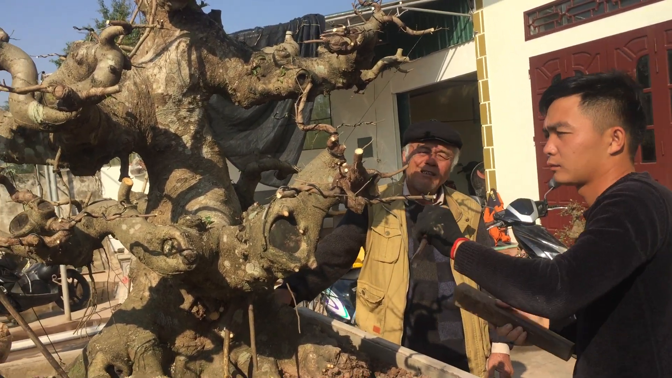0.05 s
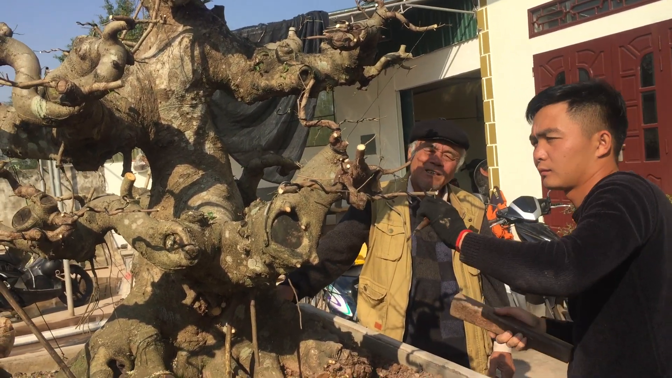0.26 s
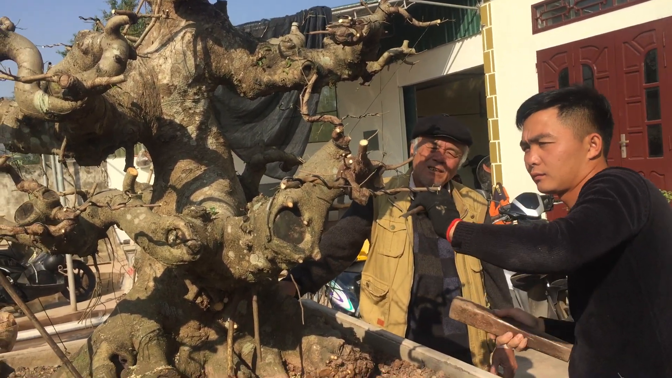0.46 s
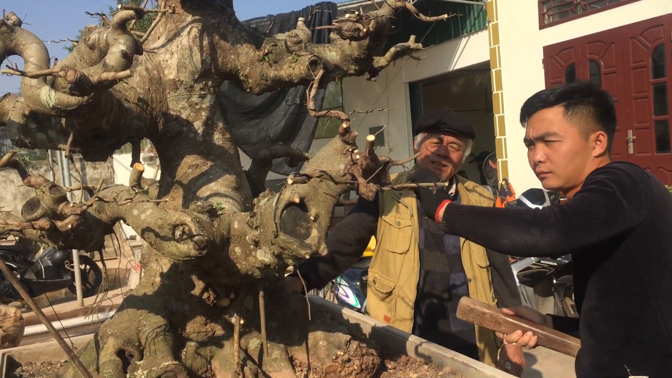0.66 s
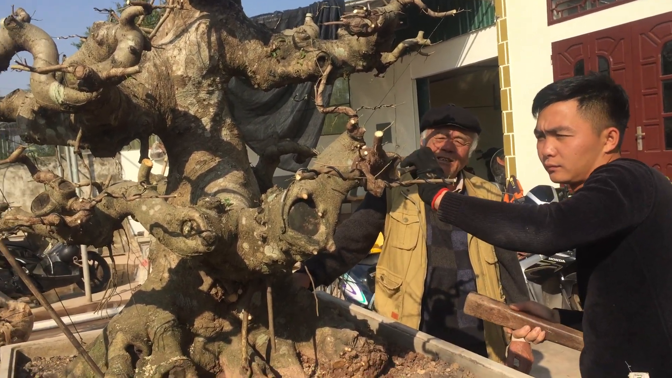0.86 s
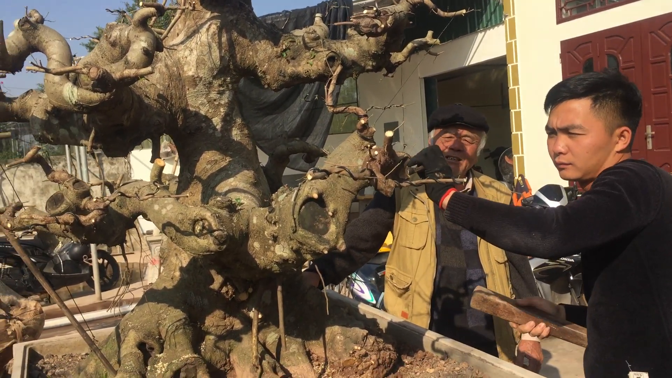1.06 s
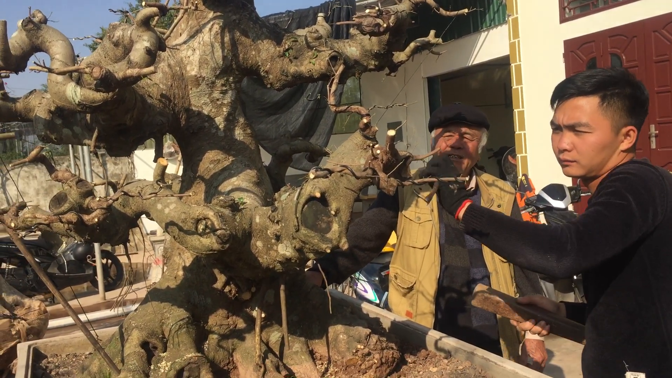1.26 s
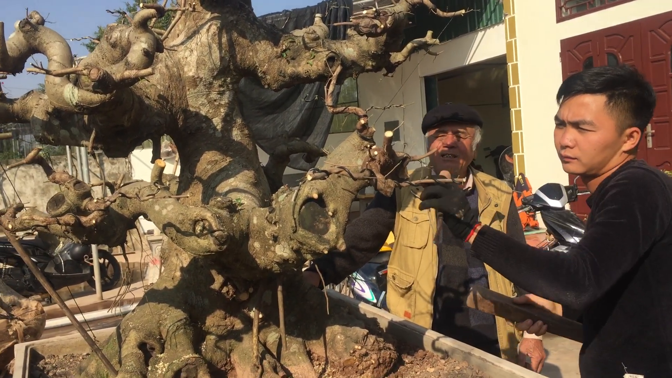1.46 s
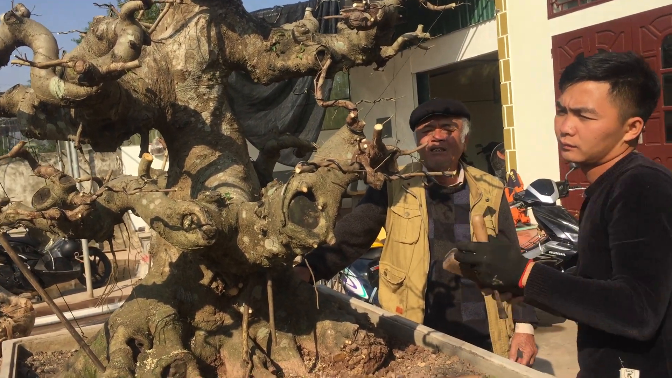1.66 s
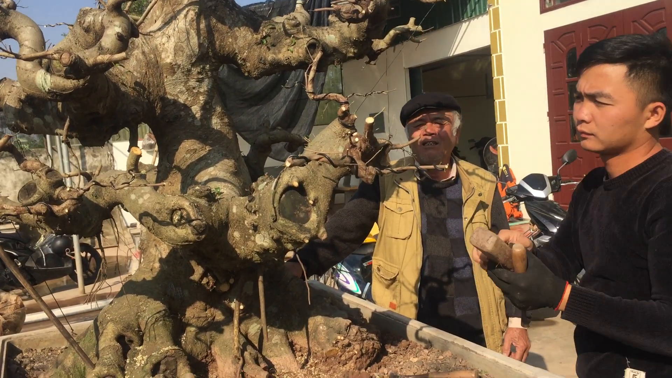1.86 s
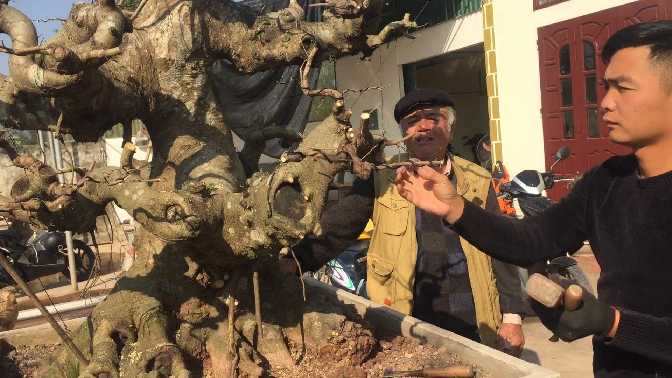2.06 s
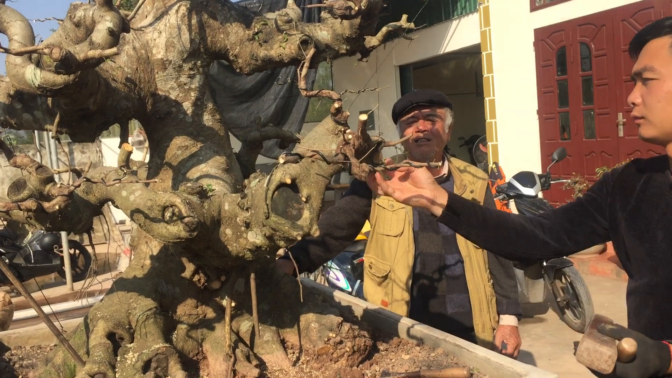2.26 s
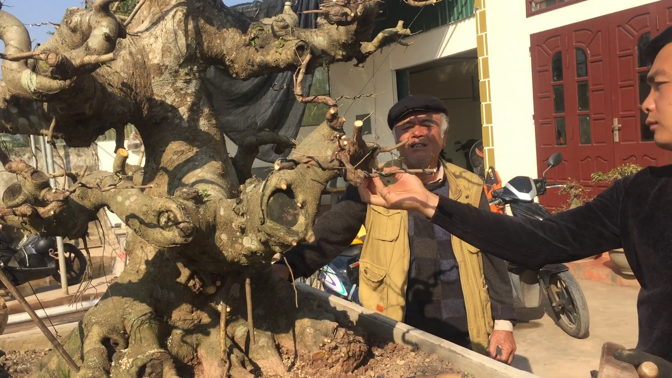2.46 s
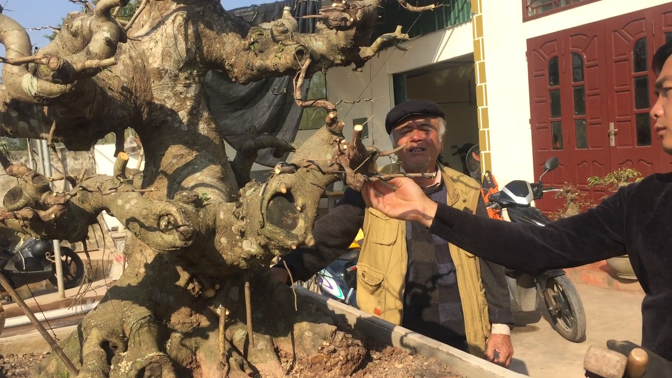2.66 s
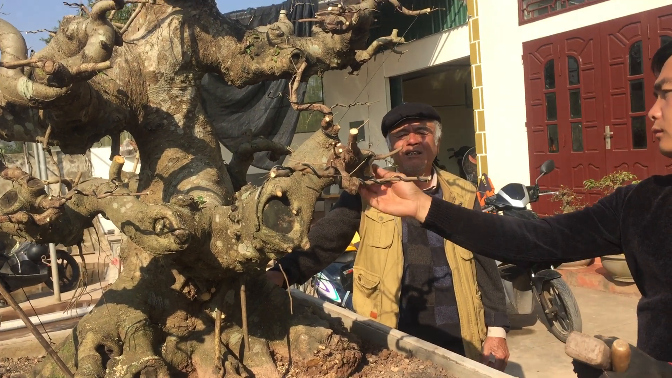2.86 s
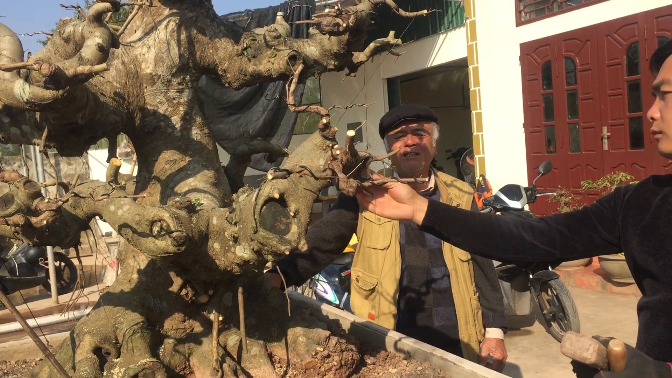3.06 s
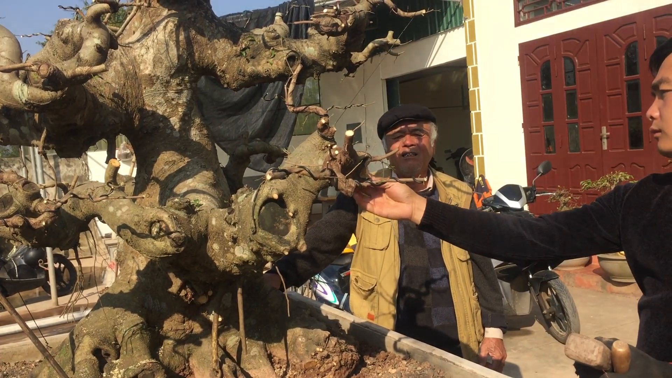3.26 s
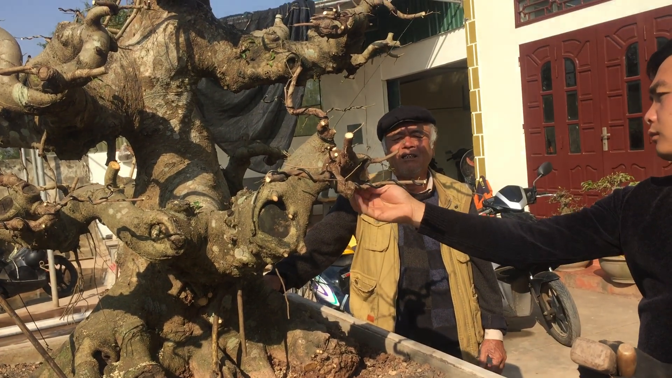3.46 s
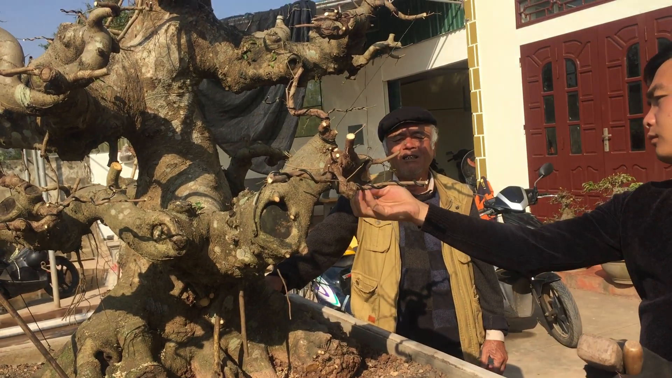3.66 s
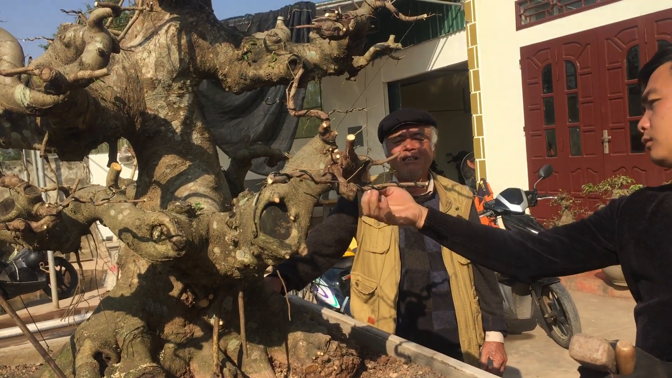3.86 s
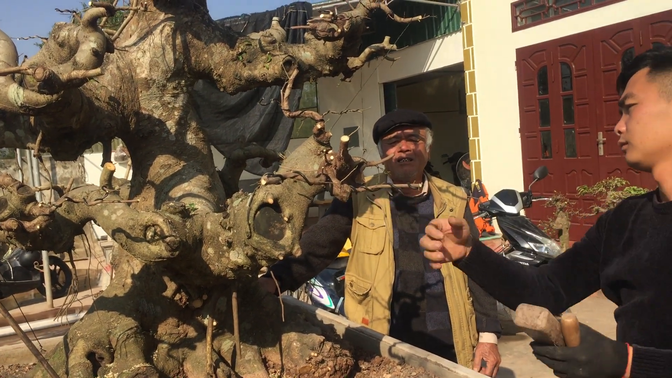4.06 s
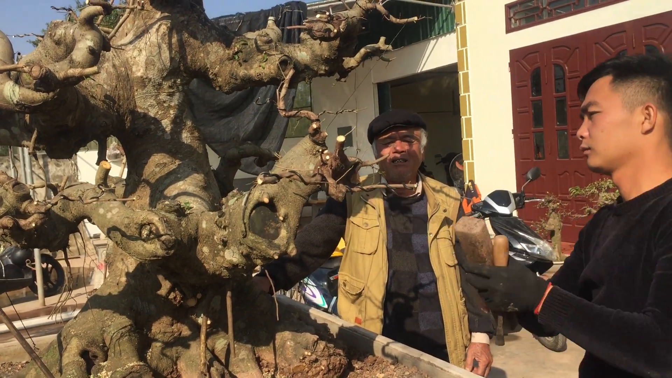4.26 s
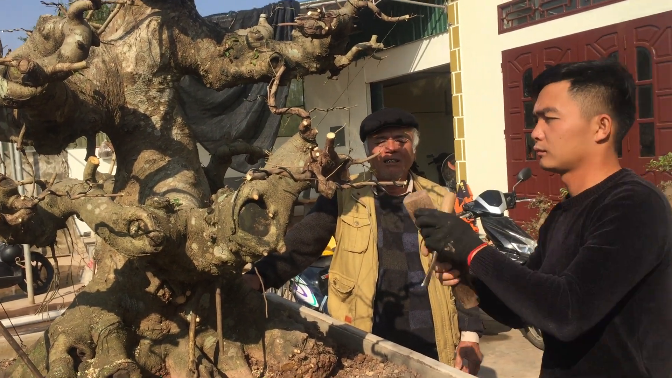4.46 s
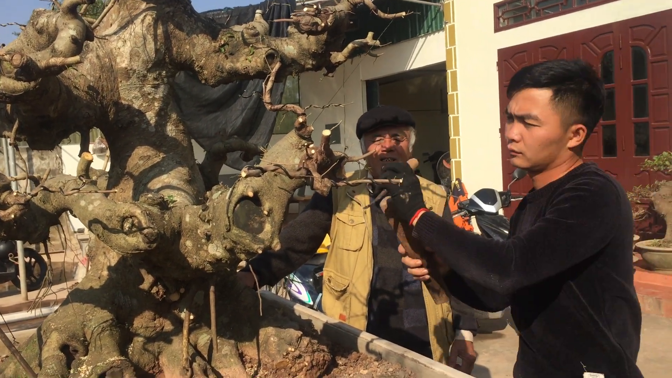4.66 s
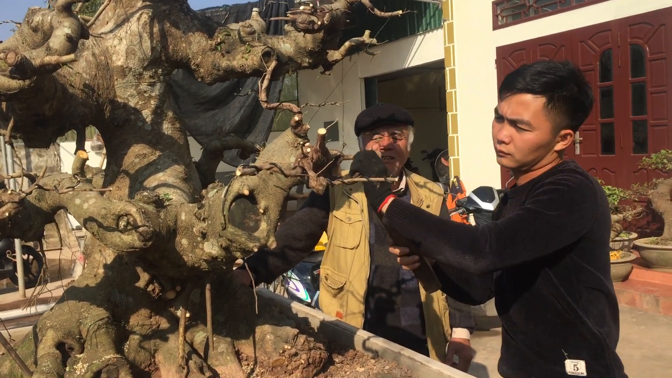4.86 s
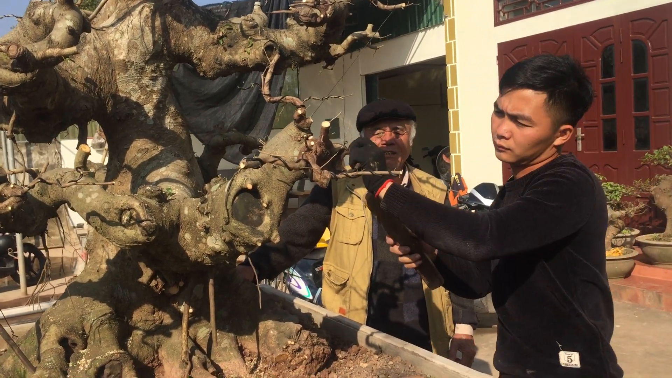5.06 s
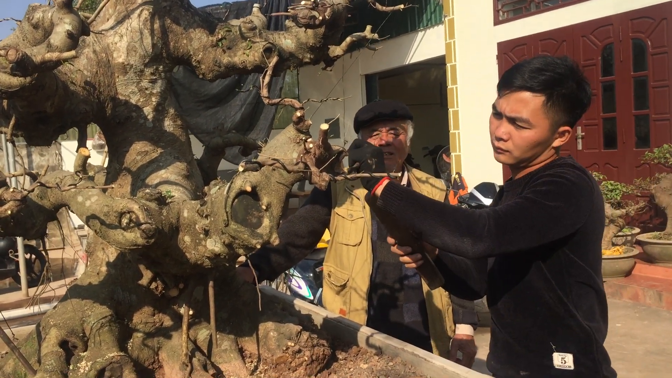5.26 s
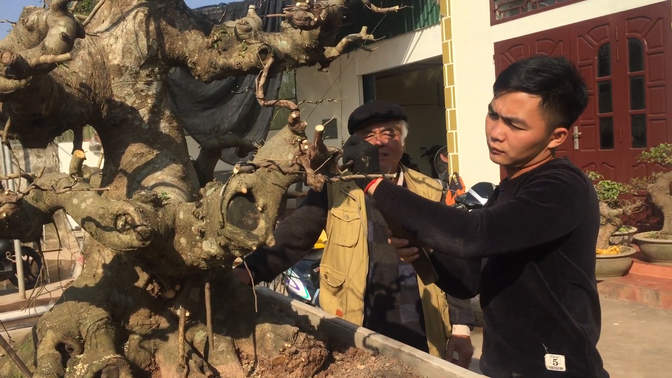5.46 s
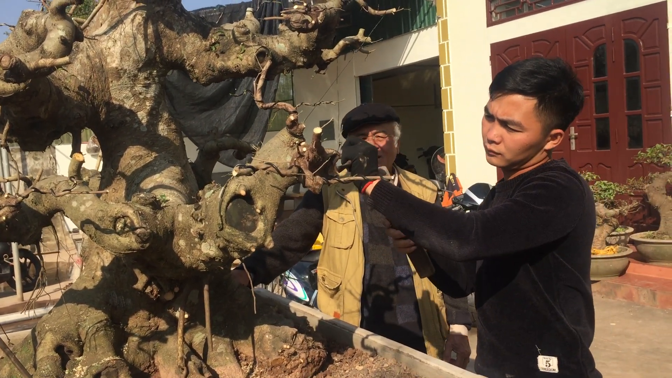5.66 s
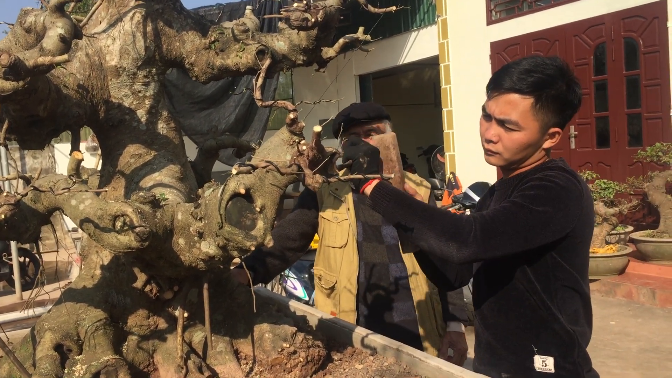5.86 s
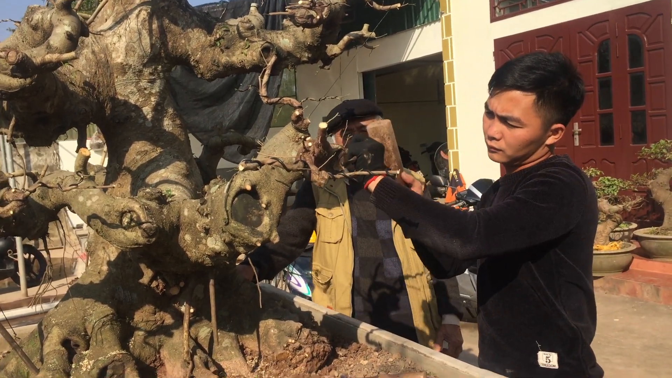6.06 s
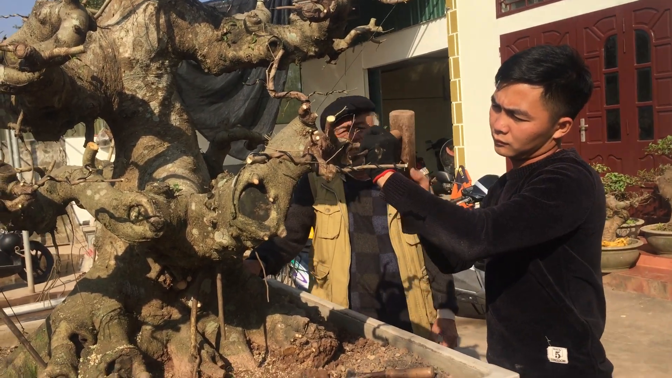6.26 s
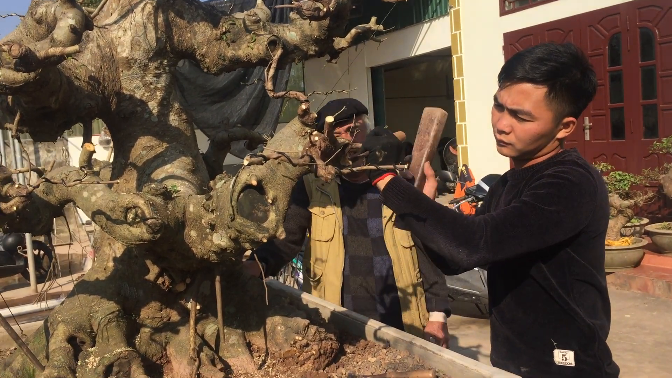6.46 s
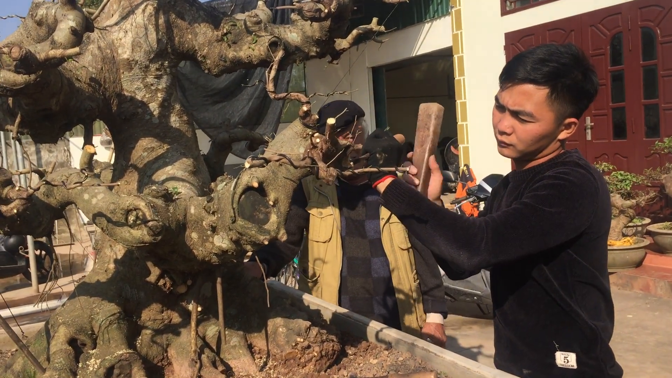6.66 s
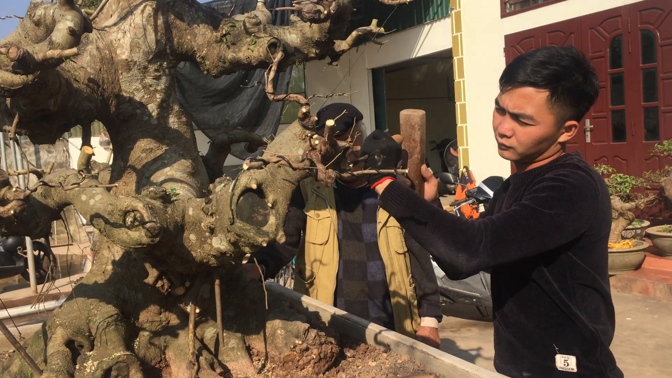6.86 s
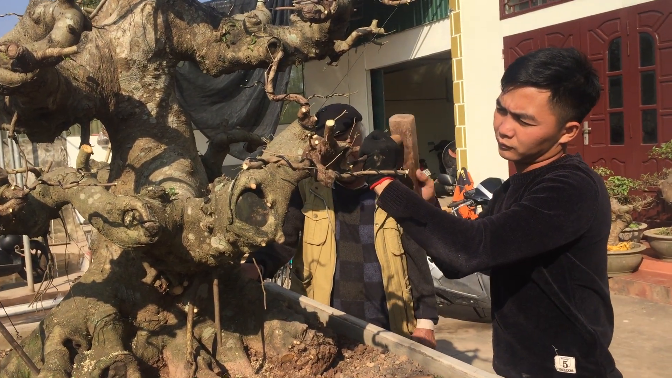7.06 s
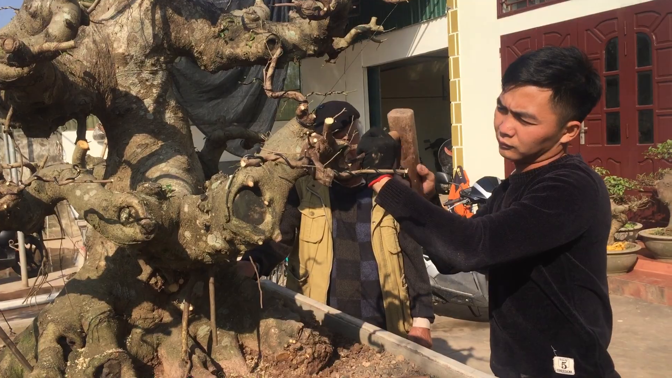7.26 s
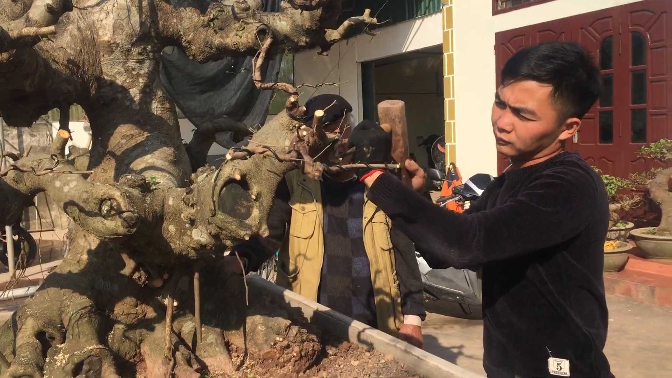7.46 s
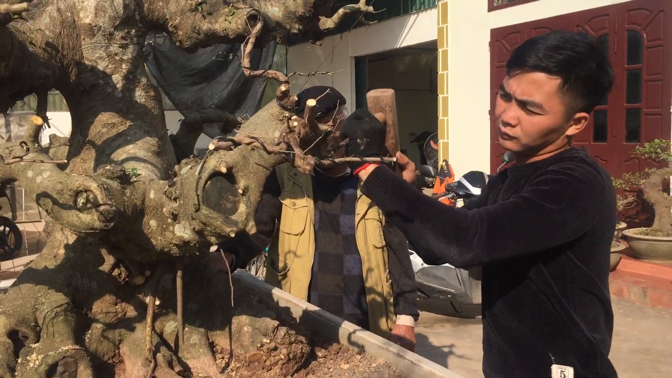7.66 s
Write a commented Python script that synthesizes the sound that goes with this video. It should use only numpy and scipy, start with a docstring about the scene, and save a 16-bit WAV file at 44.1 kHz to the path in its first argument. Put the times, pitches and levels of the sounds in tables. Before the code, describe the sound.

A quiet paved yard with a faint, steady rumble of outdoor air. For the first six seconds a carver moves softly near the microphone: his sleeve rustles, and twigs and bark tick here and there. Tiny, distant bird chirps come between about 0.5 and 2 seconds, and a hand bumps a branch dully at 0.6. At 1.9 seconds the chisel handle and wooden mallet meet in one bright clack. Light, gritty shoe scuffs follow until about 4.5, and a small twig snap stands out at 4.8. From 6.2 to 7.6 seconds the mallet drives the chisel into the trunk with seven sharp knocks, about four a second, by far the loudest sounds. The first two are lighter, the rest hard. Each combines a brief woody ring, a crack of fibres and a low thump, with a short echo from the paving and walls.

```python
"""A twig ticks and a sleeve rustles as a carver shifts about an old tree trunk in a quiet paved yard.
Faint chirps come from far off. His hand bumps a branch, his shoes scuff, and chisel and mallet clack
together once: friction gives grainy noise, impact gives damped modes. Then the wooden mallet drives the
chisel in with seven sharp knocks. Each rings the tools, cracks fibres and sends a thump of bending
waves through the trunk, while the paving, a house front and far walls scatter the sound back."""
import sys
import numpy as np
from scipy import signal
from scipy.fft import rfft, irfft
from scipy.io import wavfile

SR = 44100
rng = np.random.default_rng(int(sys.argv[2]) if len(sys.argv) > 2 else 0)


def dump_mix(stems):
    """Bounce the given channels to the path in sys.argv[1] as a 16-bit WAV at rate SR."""
    frames = np.atleast_2d(stems).T  # one column per channel
    limited = np.clip(frames, -1, 1)  # hard clip at full scale
    pcm = np.round(limited * 32767).astype(np.int16)
    wavfile.write(sys.argv[1], SR, pcm)


N = 340143
EVENT_SIZE = SR // 2   # each single sound is built in half a second
EVENT_TIME = np.arange(EVENT_SIZE) / SR
EVENT_MIDDLE_S = EVENT_TIME.mean()

# Outdoor background. Each row: frequency in Hz, spectral density in relative dB.
AIR_SPECTRUM = [(25, -28), (40, -0.5), (60, 3.5), (130, -4.5), (350, -7.5), (700, -10), (1200, -10),
                (2000, -13), (3600, -16), (4900, -20), (6800, -18.5), (10300, -22.5), (12000, -23),
                (16000, -36)]
# Snaps of twigs and bark. Each row: start in seconds, level in dB, centre in Hz, t60 in seconds.
TWIG_SNAPS = [(0.1412, -42.5, 3890, 0.013), (1.811, -44.5, 3600, 0.016), (1.826, -49.5, 3300, 0.02),
              (2.023, -45, 5300, 0.049), (2.217, -48.5, 1640, 0.025), (2.3157, -50.5, 11300, .025),
              (2.802, -50, 5200, 0.041), (3.2236, -49.5, 7250, 0.016), (4.6834, -51, 3980, 0.056),
              (4.836, -33, 6630, 0.0092), (4.936, -51, 4350, .025), (5.3197, -54, 4320, 0.032)]
# Arm movements. Each row: middle in seconds, half length in seconds, level in relative dB.
SLEEVE_MOVES = [(0.185, .042, -55), (0.428, 0.056, -59), (1.186, 0.031, -60), (1.299, 0.099, -66),
                (1.678, 0.046, -60), (1.838, 0.08, -62.5), (2.538, 0.017, -61), (2.822, 0.046, -63),
                (3.367, 0.025, -67.5), (4.853, 0.028, -55), (4.965, 0.13, -64.5), (5.38, .035, -65),
                (5.725, 0.056, -64)]
# Sliding cloth. Each row: frequency in Hz, spectral density in relative dB.
CLOTH_SPECTRUM = [(1200, -18), (2600, -3), (3700, 4.5), (4700, -6.5), (6700, -2.5), (9200, -3.5),
                  (10200, -12), (12000, -6.5), (16000, -24)]
# Far chirps, probably small birds. Each row: start in seconds, length in seconds, note in Hz, level in dB.
CHIRPS = [(0.556, 0.063, 3300, -62.5), (0.757, .1, 4000, -67), (0.918, 0.06, 1713, -60.5),
          (0.971, 0.08, 3320, -56), (1.112, 0.081, 3950, -62), (1.417, .11, 3320, -65.5),
          (1.931, 0.14, 3240, -61.5), (2.015, 0.059, 1440, -61)]
# The hand meeting the branch. Each row: start in seconds, level in dB.
HAND_BUMPS = [(0.5652, -41), (0.5831, -40.5), (0.634, -60), (0.653, -66), (3.222, -57), (6.015, -57)]
# Resonances of the branch. Each row: frequency in Hz, level in relative dB, t60 in seconds.
BRANCH_MODES = [(175, -1, 0.074), (222, 2, 0.089), (248, 5.5, 0.059), (343, 2.5, 0.065), (560, -10, 0.03),
                (679, -10.5, 0.11), (1015, -8, 0.039), (1810, -16, 0.039), (2940, -13, 0.043)]
# Shoes on grit. Each row: middle in seconds, half length in seconds, level in relative dB, centre in Hz.
SHOE_SCUFFS = [(1.882, 0.05, -56, 1790), (2.242, 0.012, -58, 2220), (2.548, 0.023, -51, 2626),
               (2.826, 0.02, -60.5, 1830), (3.231, 0.02, -57, 601), (3.828, .026, -55.5, 2610),
               (3.885, .024, -48, 2990), (4.05, 0.041, -55.5, 2356), (4.19, .044, -51.5, 1332),
               (4.504, 0.026, -53.5, 1850), (5.575, .055, -67, 740)]
# The chisel handle meeting the mallet. Each row: start in seconds, level in dB.
HANDLE_CLACKS = [(1.8900, -19.5)]
# Resonances of that clack. Each row: frequency in Hz, level in relative dB, t60 in seconds.
HANDLE_MODES = [(730, -17, 0.028), (1244, -3.5, 0.064), (1800, -0.5, 0.062), (2340, -2.5, 0.014),
                (2550, -3.5, 0.023), (2760, -13, 0.013), (3330, -29, 0.033), (3960, -11.5, 0.031),
                (5700, -27, 0.02), (7140, -37, 0.055)]
# Mallet blows. Each row: start in seconds, force in dB, depth of the edge from 0 to 1, pitch factor.
MALLET_BLOWS = [(6.1747, -8, 0.11, 0.97), (6.4214, -6, 0.08, 0.97), (6.658, -2.06, 0.49, 0.97),
                (6.9123, -0.66, 0.5, 1.014), (7.1394, -1.1, 0.27, 1.004), (7.3555, -0.5, 0.69, 0.99),
                (7.5744, -0.96, 0.82, 0.95)]
# Mallet, chisel and branch ringing together. Each row: nominal frequency in Hz,
# relative dB with the edge resting, relative dB with it sunk deep, t60 in seconds.
TOOL_MODES = [(585, -11, -27.5, 0.026), (742, -14.5, -16, 0.023), (978, -9.5, -9.5, 0.028),
              (1173, -4, -14, 0.02), (1313, -28, -11, 0.019), (1410, -28.5, -23, 0.049),
              (1548, -5.5, -16.5, 0.041), (1770, -8, -16, 0.037), (1940, -16, -39, 0.085),
              (2210, -15, -11, 0.023), (2430, -15, -15, 0.024), (2605, -8.5, -18, 0.0086),
              (2960, -12, -35, 0.015), (3120, -12, -10, 0.027), (3518, -2, -10, 0.017),
              (3653, -17.5, -19, 0.036), (3766, -15.5, -18.5, 0.046), (4136, -20.5, -7.5, 0.023),
              (4490, -60, -11, 0.011), (5530, -12, -15.5, 0.014), (5790, -23, -25, 0.066),
              (6460, -27, -3.5, 0.0067), (7530, -43, -9, 0.014)]
# Fibres splitting under the edge. Each row: frequency in Hz, spectral density in relative dB.
CRACK_SPECTRUM = [(300, -19.5), (900, 8), (3500, 9.5), (4800, -6), (7000, -10.5), (10000, -13),
                  (13000, -20), (16000, -55)]
# The broad clack a blow throws outward. Each row: frequency in Hz, spectral density in relative dB.
OUTWARD_SPECTRUM = [(200, -9), (450, -13.5), (700, -0.5), (1100, 8.5), (1600, -0.5), (2300, -3.5),
                    (2850, -6), (3400, 7), (4000, -8), (4600, -14.5), (6200, -10), (9000, -6.5),
                    (15000, -27)]
# Trunk and limbs shuddering. Each row: frequency in Hz, spectral density in relative dB.
SHUDDER_SPECTRUM = [(35, -31), (65, 3), (110, 0.5), (160, -20), (217, -12), (290, -11), (500, -13),
                    (2000, -64)]
# Early reflections from carver, paving and trunk. Each row: delay in seconds, gain in dB.
NEAR_REFLECTIONS = [(.0024, -11), (.005, -7), (.0069, -8)]
# Paving, house front and far walls.
# Each row: delay in seconds, rise time in seconds, level in relative dB, t60 in seconds.
YARD_SURFACES = [(.008, 0.0013, 10.5, 0.068), (0.023, 0.009, 4.5, 0.35), (.16, .05, -19, 1.7)]
# Colour of the yard's echoes. Each row: frequency in Hz, spectral density in relative dB.
YARD_SPECTRUM = [(50, 14), (110, 3.5), (220, 5), (450, -3.5), (800, -1), (1200, -2.5), (1550, 2.5),
                 (2200, 1), (2700, 0.5), (3400, -4), (4500, -2.5), (6300, -4.5), (9000, -11.5),
                 (15000, -11)]


def from_db(db):
    """Amplitude grows tenfold for every 20 dB."""
    return 10 ** (np.asarray(db) / 20)


def rms_one(x):
    """Normalisation to unit mean power."""
    return x / np.sqrt(np.mean(x ** 2) + 1e-20)


def decay(t60):
    """Exponential damping: 60 dB are lost in t60 seconds."""
    return np.exp(-np.log(1000) * EVENT_TIME / t60)


def add(track, start_s, sound):
    """Superposition: a sound adds to the track from start_s on; what falls outside is dropped."""
    start = round(start_s * SR)
    sound, start = sound[max(-start, 0):], max(start, 0)
    track[start:start + len(sound)] += sound[:max(len(track) - start, 0)]


def lowpass(x, hz, order=1):
    """Attenuation above a corner frequency, as in a soft contact."""
    return signal.sosfilt(signal.butter(order, hz, fs=SR, output="sos"), x)


def highpass(x, hz):
    """Attenuation below a corner frequency, as in radiation from a narrow body."""
    return signal.sosfilt(signal.butter(2, hz, "high", fs=SR, output="sos"), x)


def spectral_gain(spectrum, size):
    """A spectral envelope: (Hz, dB) points joined along a logarithmic frequency axis."""
    hz, db = np.transpose(spectrum)
    bins = np.maximum(np.fft.rfftfreq(size, 1 / SR), 1)
    return from_db(np.interp(np.log(bins), np.log(hz), db))


def noise(spectrum, size=EVENT_SIZE):
    """Spectral shaping: white noise takes on the given colour, at unit rms."""
    return rms_one(irfft(rfft(rng.standard_normal(size)) * spectral_gain(spectrum, size), size))


def contact_noise(centre_hz, octaves):
    """Chance resonances of the touched spot ripple one broad hump of noise, at unit rms."""
    bins = np.maximum(np.fft.rfftfreq(EVENT_SIZE, 1 / SR), 1)
    octaves_away = np.log2(bins / centre_hz)
    ripple_db = 4.5 * np.interp(octaves_away, np.linspace(-6, 6, 260), rng.standard_normal(260))
    gain = from_db(ripple_db) / (1 + (octaves_away / octaves / 2) ** 2) ** 2
    return rms_one(irfft(rfft(rng.standard_normal(EVENT_SIZE)) * gain))


def fluctuation(hz):
    """Random modulation at unit rms, mostly slower than hz."""
    return rms_one(lowpass(rng.standard_normal(EVENT_SIZE), hz, order=2))


def sliding(hiss, half_length, grain_db, grain_hz):
    """Stick-slip friction: many tiny slips make a smooth swell of hiss grainy."""
    slips = from_db(grain_db * fluctuation(grain_hz))
    swell = np.exp(-0.5 * ((EVENT_TIME - EVENT_MIDDLE_S) / half_length) ** 2)
    return swell * rms_one(hiss * slips)


def struck(modes, scatter_db, detune):
    """Modal vibration: each impact lands elsewhere and shares its energy anew among damped sines."""
    out = np.zeros(EVENT_SIZE)
    for k, (hz, db, t60) in enumerate(modes):
        level_draw, pitch_draw = rng.standard_normal(2)
        tone = np.sin(2 * np.pi * hz * (1 + detune * pitch_draw) * EVENT_TIME)
        out += (-1) ** k * from_db(db + scatter_db * level_draw) * decay(t60) * tone
    return out


def still_air():
    """Ambient noise: a steady floor, strongest in the bass."""
    return from_db(-61.5) * noise(AIR_SPECTRUM, N)


def twig_snaps():
    """Brittle fracture: twigs and bark release short, damped bursts of noise."""
    out = np.zeros(N)
    for start, db, hz, t60 in TWIG_SNAPS:
        burst = lowpass(contact_noise(hz, octaves=0.6), hz=12700, order=2)
        add(out, start, from_db(db) * burst * decay(t60))
    return out


def sleeve_rustles():
    """Sliding friction: a sleeve hisses with the colour of its cloth as the arm moves."""
    out = np.zeros(N)
    for middle, half_length, db in SLEEVE_MOVES:
        rustle = sliding(noise(CLOTH_SPECTRUM), half_length, grain_db=5, grain_hz=378)
        add(out, middle - EVENT_MIDDLE_S, from_db(db) * rustle)
    return out


def bark_crumbs(per_move):
    """Random small impacts: crumbs of bark tick unevenly as each arm movement brushes the trunk."""
    out = np.zeros(N)
    for middle, half_length, sleeve_db in SLEEVE_MOVES:
        for offset, faintness, shade in rng.standard_normal((per_move, 3)):
            tick = contact_noise(centre_hz=5270 * 2 ** (0.31 * shade), octaves=0.53) * decay(t60=0.025)
            db = sleeve_db - 3 - 2 * min(faintness, 1)
            add(out, middle + offset * half_length, from_db(db) * tick)
    return out


def distant_chirps():
    """Frequency and amplitude modulation: thin notes scoop upward, waver and flutter."""
    out = np.zeros(N)
    scoop = 0.0487 * np.exp(-EVENT_TIME / 0.024)
    for start, length, hz, db in CHIRPS:
        waver = 0.019 * fluctuation(hz=200)
        flutter_db = 4.5 * fluctuation(hz=200)
        phase = 2 * np.pi * np.cumsum(hz * (1 - scoop + waver)) / SR
        tone = np.sin(phase) + from_db(-11) * np.sin(2 * phase)
        arch = np.sin(np.pi * np.minimum(EVENT_TIME / length, 1) ** 1.4)   # peaks late in the note
        add(out, start, from_db(db + flutter_db) * arch * tone)
    return out


def hand_bumps():
    """Soft impact: the hand excites mainly the low modes of the branch."""
    out = np.zeros(N)
    for start, db in HAND_BUMPS:
        contact = from_db(-14) * contact_noise(centre_hz=977, octaves=0.9) * decay(t60=0.03)
        ring = struck(BRANCH_MODES, scatter_db=2, detune=0.036)
        add(out, start, from_db(db) * (ring + contact))
    return out


def shoe_scuffs():
    """Friction on paving: grit hisses and rasps at its own resonance above the dull rub of the sole."""
    out = np.zeros(N)
    for middle, half_length, db, hz in SHOE_SCUFFS:
        grit = lowpass(contact_noise(hz, octaves=0.8), hz=10100, order=2)
        rasp = from_db(-9.5) * contact_noise(centre_hz=3015, octaves=0.064)
        sole = from_db(-13.5) * contact_noise(centre_hz=338.4, octaves=0.8)
        scuff = sliding(grit + rasp + sole, half_length, grain_db=3, grain_hz=230)
        add(out, middle - EVENT_MIDDLE_S, from_db(db) * scuff)
    return out


def handle_clack():
    """Hard impact: the chisel handle meets the mallet and rings briefly in its high modes."""
    out = np.zeros(N)
    for start, db in HANDLE_CLACKS:
        contact = from_db(-15) * contact_noise(centre_hz=2270, octaves=0.52) * decay(t60=0.09)
        ring = struck(HANDLE_MODES, scatter_db=3, detune=0.0017)
        add(out, start, from_db(db) * lowpass(ring + contact, hz=7500, order=2))
    return out


def mallet_contact(x, force_db):
    """Contact time limits bandwidth: a harder blow is louder and brighter, a gentle one more cushioned."""
    contact_hz = 5560 * from_db(1.63 * force_db)
    cushion_hz = 8300 * from_db(0.56 * force_db)   # the wooden face rounds off the first instant
    return from_db(2.5 + 0.78 * force_db) * lowpass(lowpass(x, contact_hz), cushion_hz, order=2)


def tool_ring(force_db, depth, pitch):
    """Coupled vibration: the balance of the modes shifts as the wood grips the edge."""
    modes = [(hz * pitch, resting_db + (sunk_db - resting_db) * depth, t60)
             for hz, resting_db, sunk_db, t60 in TOOL_MODES]
    return mallet_contact(struck(modes, scatter_db=0.7, detune=0.003), force_db)


def fibre_crack(force_db):
    """Fracture noise: a harder blow splits more fibres under the edge."""
    envelope = decay(t60=0.01) + from_db(-14) * decay(t60=0.025)
    return from_db(-4.5 + 2.44 * force_db) * noise(CRACK_SPECTRUM) * envelope


def outward_clack(force_db):
    """Directivity: the sides of the tools that face the walls radiate a broader, less pitched click."""
    click = irfft(spectral_gain(OUTWARD_SPECTRUM, EVENT_SIZE))
    click = np.roll(click, SR // 500)   # a 2 ms delay takes in the rise of the pulse
    return from_db(14) * mallet_contact(click / np.linalg.norm(click), force_db)


def trunk_thump(force_db, start_hz=356.5, end_hz=88.6, glide_s=0.00946, rise_s=0.0022):
    """Dispersion: high bending waves arrive first, so the thump falls in pitch; the limbs shudder on."""
    hz = end_hz + (start_hz - end_hz) * np.exp(-EVENT_TIME / glide_s)
    onset = 1 - np.exp(-(EVENT_TIME / rise_s) ** 2)
    thump = np.sin(2 * np.pi * np.cumsum(hz) / SR) * onset * decay(t60=0.097)
    shudder = from_db(-16) * noise(SHUDDER_SPECTRUM) * decay(t60=0.33)
    return from_db(-18.5 + 2.07 * force_db) * highpass(thump + shudder, hz=76)


def mallet_knocks():
    """One impulse drives tools, fibres and trunk. Returns the near sound and what the walls receive."""
    near, to_walls = np.zeros(N), np.zeros(N)
    for start, force_db, depth, pitch in MALLET_BLOWS:
        ring = tool_ring(force_db, depth, pitch)
        crack = fibre_crack(force_db)
        thump = trunk_thump(force_db)
        # the small tools radiate no bass of their own
        add(near, start, highpass(ring + with_reflections(crack), hz=333) + thump)
        outward = highpass(0.42 * ring + outward_clack(force_db) + crack, hz=285)
        wall_share = from_db(-0.6 - 0.43 * force_db)
        add(to_walls, start, wall_share * (outward + thump))
    return near, to_walls


def with_reflections(x):
    """Early reflection: nearby surfaces repeat a sound within milliseconds, a little duller."""
    out, dull = x.copy(), lowpass(x, hz=7200)
    for delay, db in NEAR_REFLECTIONS:
        add(out, delay * (1 + 0.025 * rng.standard_normal()), from_db(db) * dull)
    return out


def yard_echoes(x):
    """Diffuse scattering: each surface returns a cluster of echoes that swells and dies."""
    envelope = np.zeros(EVENT_SIZE)
    for delay, rise, db, t60 in YARD_SURFACES:
        since = np.maximum(EVENT_TIME - delay, 0)
        envelope += from_db(db - 60 * since / t60) * (1 - np.exp(-since / rise))
    response = noise(YARD_SPECTRUM) * envelope
    return signal.fftconvolve(x, response / np.linalg.norm(response))[:N]


def scene():
    """Superposition: the carver, the chirps, the yard's answer and the air sum in one channel."""
    knocks, to_walls = mallet_knocks()
    handling = handle_clack() + hand_bumps() + twig_snaps()
    friction = from_db(-1.5) * with_reflections(sleeve_rustles() + shoe_scuffs())
    movements = handling + friction + bark_crumbs(per_move=3)
    chirps = distant_chirps()
    echoes = from_db(-14) * yard_echoes(to_walls + from_db(-6) * movements + from_db(9.5) * chirps)
    return (knocks + movements + chirps + echoes + still_air())[None]


def record(dry):
    """Band limiting and saturation: the deepest bass and the top are cut, the loudest peaks rounded."""
    ceiling, top_hz = 0.72, 16000
    heard = highpass(dry, hz=35.7)
    rounded = heard / (1 + (heard / ceiling) ** 4) ** (1 / 4)
    return signal.sosfilt(signal.ellip(10, 0.1, 80, top_hz, fs=SR, output="sos"), rounded)


dry = scene()
out = record(dry)
dump_mix(out)
```